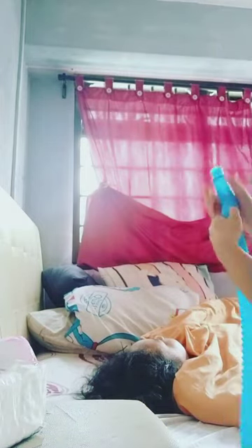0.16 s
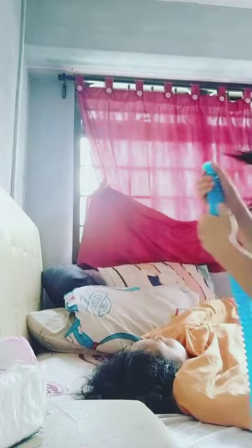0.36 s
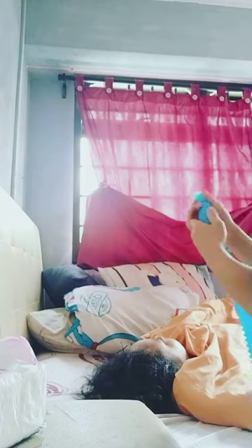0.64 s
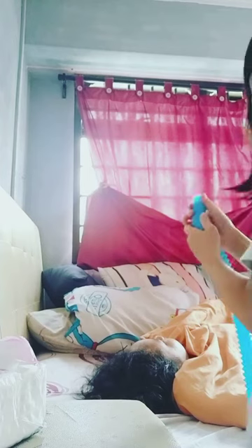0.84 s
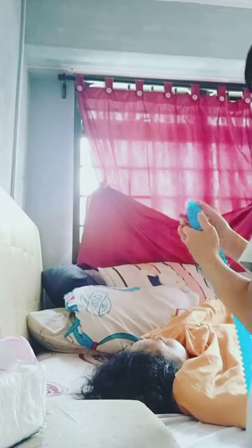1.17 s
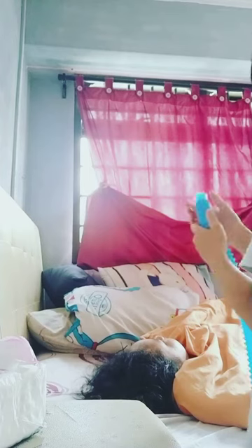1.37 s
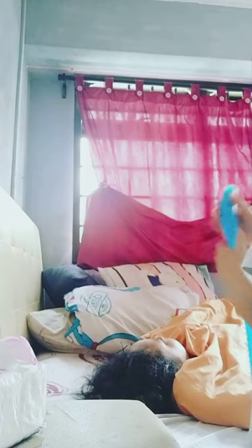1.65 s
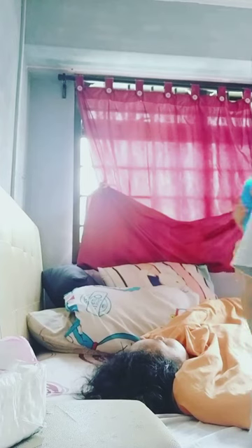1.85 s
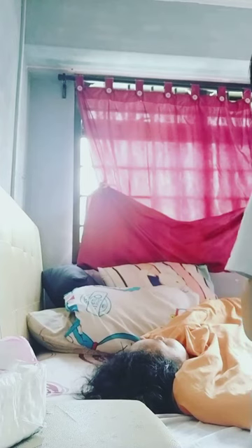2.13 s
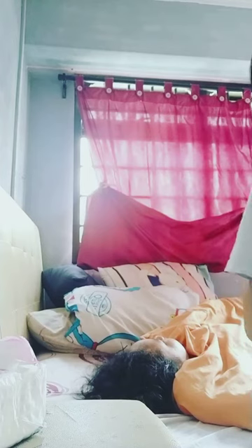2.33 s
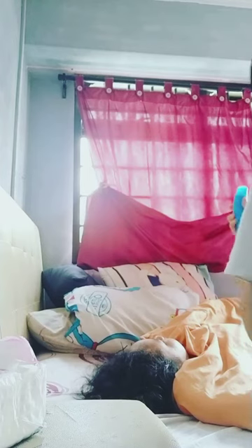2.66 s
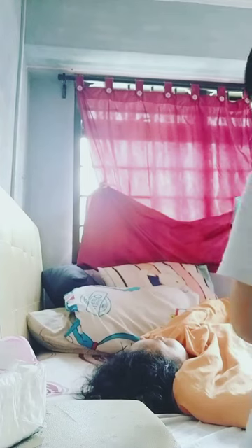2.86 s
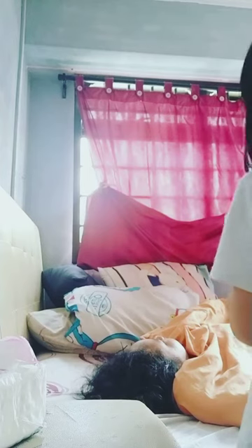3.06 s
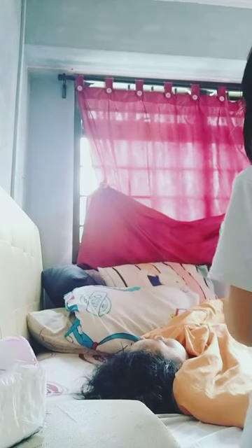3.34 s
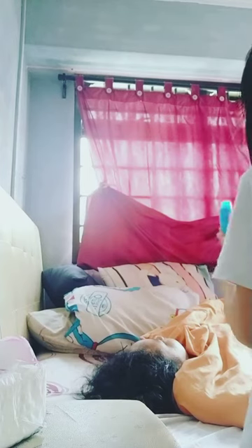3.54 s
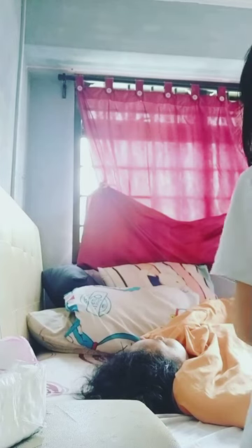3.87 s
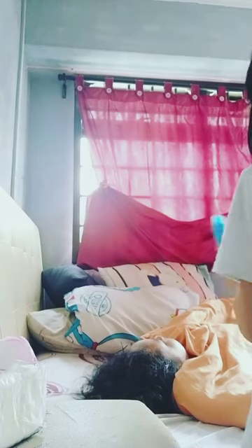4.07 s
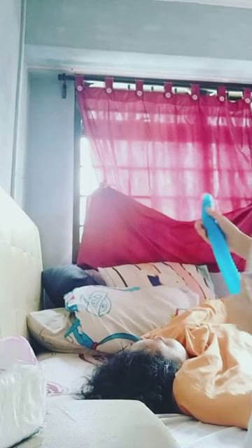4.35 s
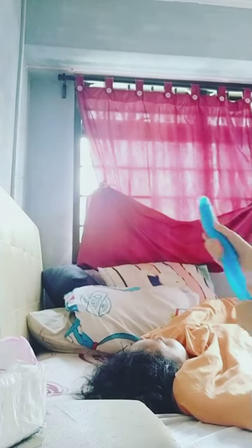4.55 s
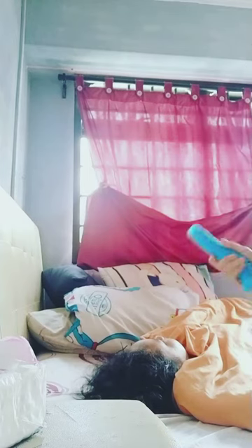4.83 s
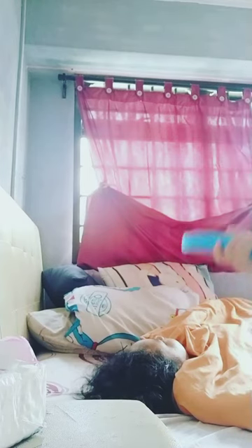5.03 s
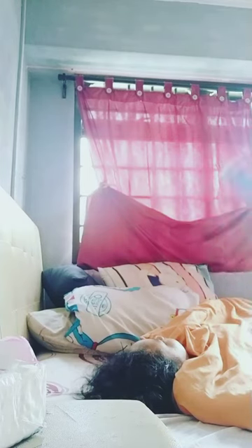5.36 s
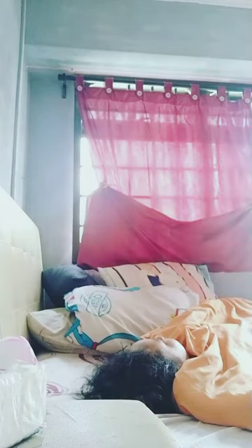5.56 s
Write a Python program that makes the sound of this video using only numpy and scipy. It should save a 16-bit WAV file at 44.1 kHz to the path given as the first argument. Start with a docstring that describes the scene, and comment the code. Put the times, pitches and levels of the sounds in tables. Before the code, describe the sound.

Loud, crisp plastic ridges snap in separate clusters, each later burst ringing more hollow and higher, over faint low room rumble.

```python
"""A low hum and rumble fill a small bedroom, and fingers hiss softly along a corrugated plastic pop tube.
The tube is then squeezed shut in short bursts: each ridge snaps over with a sharp crack, made of shaped
noise pulses, and rings the air column, damped sines whose note climbs as the tube shortens.
Handling thuds dully during the squeezes, a fingertip ticks and skin hisses between bursts,
and a decaying noise tail answers every snap; the bursts start on ever higher notes."""
import sys
import numpy as np
from scipy import signal
from scipy.fft import rfft, irfft, next_fast_len
from scipy.io import wavfile
from scipy.ndimage import uniform_filter1d

SR = 44100
rng = np.random.default_rng(int(sys.argv[2]) if len(sys.argv) > 2 else 0)


def bounce(signal):
    """Save signal as a 16-bit WAV file at the path given by the first command-line argument."""
    frames = np.transpose(np.atleast_2d(signal))
    limited = np.clip(frames, -1, 1)
    pcm = np.round(limited * 32767).astype(np.int16)
    wavfile.write(sys.argv[1], SR, pcm)


N = 251370  # length in samples

# Spectrum of the room's own noise. Each row: frequency in Hz, relative density in dB per Hz.
ROOM_NOISE_SPECTRUM = [(25, -2.5), (60, 3), (110, 4), (160, -1), (260, -11.5), (550, -7), (880, -6.5),
                       (1200, -13.5), (1500, -9), (2000, -18.5), (3200, -20), (4100, -41), (6000, -20.5),
                       (10000, -43)]
# Level of the room's noise, before its lean to the right. Each row: time in seconds, level in dB.
ROOM_NOISE_LEVEL = [(.1, -64), (.5, -62.5), (1.099, -73.5), (1.8, -71), (2.499, -63.5), (3.401, -61),
                    (4.3, -62.5), (5.101, -61.5), (5.7, -67)]

# Fingers sliding to a new grip. Each row: centre in seconds, half length in seconds, level in dB.
GRIP_SLIDES = [(0.165, 0.072, -59.5), (1.684, 0.047, -54.5), (2.58, 0.054, -56), (3.451, 0.048, -56.5),
               (4.31, 0.047, -51.5), (4.463, 0.033, -54.5)]
# Spectrum of skin on plastic. Each row: frequency in Hz, relative density in dB per Hz.
SKIN_SPECTRUM = [(3000, -14.5), (4200, -8), (5400, 4), (7000, 0.5), (9000, -9), (13000, -12), (16000, 1.5)]

# Ridges snapping over. Each row: start in seconds, crack level in dB, brightness in dB per octave,
# air-column ring in dB.
RIDGE_SNAPS = [(0.4072, -5.5, -4, -28.5), (0.4409, -1.5, -6, -34.5), (.578, 15, -2.5, -34.5),
               (0.6243, 14.5, -2.5, -33), (0.6707, 1.5, -7.5, -43), (0.7625, 4, -2.5, -50),
               (0.8647, 1, -5.5, -46), (1.8831, -31, -18.5, -38.5), (1.9279, 13.5, -2, -25.5),
               (1.936, -3.5, 0.5, -46), (2.062, 7, -3, -41.5), (2.0767, 1, 2.5, -43),
               (2.081, 14, -1, -43.5), (2.1447, 14, 0.5, -36.5), (2.2008, 17, -3, -31),
               (2.216, 11, -7, -29), (2.7582, -14, -0.5, -21), (2.7635, 12, -1, -21), (2.7736, 11, -4, -38),
               (2.8718, -8, -9, -27.5), (2.8842, 8.5, -6.5, -45), (2.9165, 19, -0.5, -35),
               (3.0148, 7, 9, -53), (3.0796, 18, 2, -30), (3.1115, 16, -6, -28.5), (3.54, -33, 2.5, -38),
               (3.5755, 8.5, -3.5, -29.5), (3.5904, 15, -6, -19), (3.7324, 4.5, -10, -26),
               (3.7802, 17, -1.5, -29), (3.7893, 0.5, 5.5, -49.5), (3.8644, 1, -1.5, -37),
               (3.9255, 12.5, -6.5, -37), (3.9568, 8.5, -5, -27.5), (4.5828, 9.5, -4.5, -27),
               (4.5963, 1, -1.5, -19), (4.6068, 4, -18, -31), (4.6154, 4, -5.5, -20),
               (4.627, -10, -2, -38.5), (4.635, 14, -11, -18.5), (4.7614, 9, -14.5, -15),
               (4.858, -14.5, -7, -32.5), (4.8825, 12.5, -13, -12), (5.2579, -1, -8, -16.5),
               (5.2925, 10.5, -8.5, -10), (5.2985, 17.5, -7, -21.5), (5.306, 2, -5, -13.5),
               (5.3268, 8, -8, -15), (5.3419, 6.5, -3, -11), (5.367, 17.5, -4.5, -16),
               (5.3951, 16, -4.5, -13), (5.437, 11.5, 1, -16), (5.4615, 4.5, -12.5, -16.5),
               (5.5894, 8.5, -9.5, -5), (5.5987, 14, -4.5, -5), (5.6849, 5.5, -16, -13.5),
               (5.6911, 7, 2.5, -27)]
# Squeezes of the tube; every snap shortens the pipe and lifts its note one step.
# Each row: start in seconds, first note in Hz, step in Hz, octave over the note in dB, dome of the crack
# spectrum in dB per octave squared, ridge resonance in Hz, its sag in octaves per second, its height in dB,
# knock of the stack in dB, room in dB, lean of the crack to the left in dB.
SQUEEZE_STROKES = [(.39, 278.3, 2.5, -7, 3.5, 5200, 4.6, 2.5, -7, -0.5, 1.5),
                   (1.87, 293.8, 5.8, -2, 5.5, 3150, .5, 8, -21, -0.5, 2),
                   (2.74, 340, 6, -9, 8.5, 4900, 4.3, 4.5, -29, -0.5, 1),
                   (3.52, 371.1, 11.5, -3.5, 5, 5300, 4.9, 7, -35, -1, 0.8),
                   (4.56, 411, 7.1, -12.5, 3, 4600, 0.18, 20, -21, 3, .3),
                   (4.632, 464.8, 13, 0, -1.04, 2300, 0.34, 4.5, -0.5, -5, 1.1),
                   (5.24, 525, 4.6, -2.5, 5.5, 1950, .3, 4.5, -4.5, -5.5, 1),
                   (5.57, 561, 1.7, -16.5, 6.5, 2900, .3, 10, 2.5, -3.5, 1.4)]
# Colour the plastic wall gives to all cracks. Each row: frequency in Hz, gain in dB.
WALL_COLOUR = [(60, -51.5), (200, -30.5), (450, -15.5), (750, -6.5), (1150, -1), (1700, -4), (2300, -2),
               (3300, 0), (4000, -1), (5000, 4.5), (7200, 8.5), (8800, 0.5), (10500, -2), (14000, 10.5)]
# Higher air-column modes. Each row: multiple of the note, level in dB relative to the crack and
# decay time t60 in seconds, both for a pipe at the reference note.
COLUMN_OVERTONES = [(3.06, -44.5, 0.12), (4.02, -38.5, 0.059), (5.1, -49.5, 0.069), (6.06, -43, 0.064),
                    (7.2, -61.5, 0.027)]
# Short-lived modes of the folded stack of ridges, loud in the dull pops.
# Each row: frequency in Hz, level in dB relative to the crack before the squeeze's knock, t60 in seconds.
STACK_MODES = [(1020, -31.5, 0.0067), (1160, -46, 0.0094), (1350, -46, 0.0053), (1880, -44, 0.054),
               (2450, -32.5, 0.041)]
# Decay of the room. Each row: frequency in Hz, t60 in seconds.
ROOM_DECAY = [(150, 0.5), (400, 0.18), (1000, 0.31), (3000, 0.27), (7000, 0.29), (13000, 0.29)]
# Colour of the room's answer. Each row: frequency in Hz, gain in dB.
ROOM_COLOUR = [(150, 8.5), (500, 8), (1100, -4), (3000, -2.5), (6000, -2), (13000, -2.5)]

# Soft thuds of handling the tube. Each row: start in seconds, frequency in Hz, level in dB, t60 in seconds.
HAND_BUMPS = [(0.623, 70, -41, 0.061), (0.624, 131, -49, 0.053), (4.615, 170, -33, 0.066),
              (4.632, 220, -35.5, 0.11)]

# A fingertip ticks against the tube while changing grip. Each row: start in seconds, level in dB.
FINGER_TICKS = [(1.504, -64.5), (4.198, -54)]
# Spectrum of a tick. Each row: frequency in Hz, relative density in dB per Hz.
TICK_SPECTRUM = [(2200, -27), (3100, -14), (3550, -1.5), (4200, -18), (6000, -13), (14000, -29)]

# the crack's tilted dome pivots on the first frequency and is flat below the second
CRACK_MID_HZ, CRACK_LOW_HZ = 2500, 1190
# every squeeze starts with this dome (dB per octave squared) and reaches its own once the grip is firm
FIRST_DOME, FIRM_S = 1.6, 0.2
RIDGE_OCTAVES = 0.3  # half width of the ridge's resonance
REFERENCE_NOTE_HZ = 400  # note of a pipe of relative length 1
TICK_T60 = 0.19  # s
TOP_HZ = 16000  # band limit


def amp(db):
    """Decibels are a logarithmic measure of amplitude; this returns the gain."""
    return 10 ** (np.asarray(db) / 20)


def unit(x):
    """Dividing by the root mean square sets the rms to 1."""
    return x / np.sqrt(np.mean(x ** 2) + 1e-20)


def along(points, hz):
    """Interpolation on a logarithmic frequency axis, for rows of frequency and value."""
    f, values = np.transpose(points)
    return np.interp(np.log(hz + 1), np.log(f), values)


def filtered(x, response):
    """Linear filtering: the spectrum of x is multiplied by a response of frequency."""
    n = x.shape[-1]
    padded = next_fast_len(n + 2048)
    hz = np.fft.rfftfreq(padded, 1 / SR)
    return irfft(rfft(x, padded) * response(hz), padded)[..., :n]


def noise(spectrum, apart):
    """Stereo noise of rms 1 as mid and side; apart is the weight of the side, which differs left to right."""
    mid, side = filtered(rng.standard_normal((2, N)), lambda hz: amp(along(spectrum, hz)))
    return unit(np.array([mid + apart * side, mid - apart * side]))


def mode(t, hz, db, t60, attack_s=0.0023):
    """One damped resonance: a sine with exponential decay and a short onset."""
    onset = 1 - np.exp(-t / attack_s)
    return amp(db - 60 * t / t60) * np.sin(2 * np.pi * hz * t) * onset


def room_noise(right_db=7.5, hum_hz=63, hum_db=-69):
    """Superposition of broadband rumble of slowly varying level and a steady sine hum, stronger on the right."""
    t = np.arange(N) / SR
    level_db = np.interp(t, *np.transpose(ROOM_NOISE_LEVEL))
    rumble = amp(level_db) * noise(ROOM_NOISE_SPECTRUM, apart=1.0)
    hum = amp(hum_db) * np.sin(2 * np.pi * hum_hz * t)
    return (rumble + hum) * amp([[-right_db], [right_db]])


def fingers():
    """Sliding friction: skin hisses on the plastic in soft Gaussian swells."""
    t = np.arange(N) / SR
    swell = sum(amp(db) * np.exp(-.5 * ((t - s) / width) ** 2) for s, width, db in GRIP_SLIDES)
    return swell * noise(SKIN_SPECTRUM, apart=1.0)


def crack_colour(db, brightness, dome, ridge_hz, ridge_db):
    """Spectral envelope of one crack: a tilted dome carries the ridge's resonance, coloured by the wall."""
    def colour(hz):
        octaves = np.log2(np.maximum(hz, CRACK_LOW_HZ) / CRACK_MID_HZ)
        peak = np.exp(-.5 * (np.log2((hz + 1) / ridge_hz) / RIDGE_OCTAVES) ** 2)
        dome_db = db + brightness * octaves - dome * octaves ** 2
        return dome_db + ridge_db * (peak - .5) + along(WALL_COLOUR, hz)
    return colour


def snaps():
    """A shorter pipe has a higher note: it climbs by steps in each squeeze as the ridge's resonance sinks."""
    ends = [row[0] for row in SQUEEZE_STROKES[1:]] + [np.inf]
    for squeeze, end in zip(SQUEEZE_STROKES, ends):
        start, first_hz, step_hz, octave_db, dome, ridge_hz, sag, ridge_db, *hold = squeeze
        run = [row for row in RIDGE_SNAPS if start <= row[0] < end]
        for k, (s, db, brightness, ring_db) in enumerate(run):
            firm = min((s - start) / FIRM_S, 1)
            dome_now = FIRST_DOME + firm * (dome - FIRST_DOME)
            # the tabled resonance is the one heard when the grip becomes firm
            ridge_now_hz = ridge_hz * 2 ** (-sag * (s - start - FIRM_S))
            colour = crack_colour(db, brightness, dome_now, ridge_now_hz, firm * ridge_db)
            yield s, first_hz + k * step_hz, ring_db, ring_db + octave_db, colour, hold


def click(gain_db, size=1024):
    """Minimum phase: the folded cepstrum gives the most compact causal pulse with a given spectrum."""
    hz = np.fft.rfftfreq(size, 1 / SR)
    cepstrum = irfft(np.log(amp(gain_db(hz))))
    cepstrum[1:size // 2] *= 2
    cepstrum[size // 2 + 1:] = 0
    return irfft(np.exp(rfft(cepstrum)))


def crack(colour, echo_s=.0013, echo=0.99, burst=1.0, burst_s=0.0029, crinkle=1.0, crinkle_t60=0.016,
          size=1024):
    """Impulse and early reflection: a sharp click, its quick echo off a nearby surface, and brief noise."""
    t = np.arange(size) / SR
    # a short noise burst spreads the click
    push = rng.standard_normal(size) * np.sin(np.pi * np.minimum(t / burst_s, 1))
    push *= burst / np.linalg.norm(push)
    push[0] += 1
    # the echo's delay is drawn at random within a fifth of echo_s
    push[round(echo_s * rng.uniform(.8, 1.2) * SR)] += echo
    # the wall crinkles briefly
    scatter = rng.standard_normal((2, size)) * amp(-60 * t / crinkle_t60)
    push = push / np.linalg.norm(push) + crinkle * scatter / np.linalg.norm(scatter[0])
    # the push carries the same energy in every broad band
    spectrum = rfft(push, 2 * size)
    power = np.mean(np.abs(spectrum) ** 2, 0)
    spectrum /= np.sqrt(uniform_filter1d(power, size=61))
    return signal.fftconvolve(irfft(spectrum)[:, :size], click(colour)[None], axes=1)


def through_pipe(x, note_hz, reflection=0.43, leak_hz=2600):
    """Repeated reflection: a crack runs to and fro between the open ends; its treble escapes at once."""
    def response(hz):
        kept = reflection * np.exp(-(hz / leak_hz) ** 2)
        round_trip = np.exp(-2j * np.pi * hz / note_hz)
        return np.sqrt(1 - kept ** 2) / (1 - kept * round_trip)
    return filtered(x, response)


def air_column(t, note_hz, note_db, octave_db, colour, note_t60=0.11, octave_t60=0.088, note_trim_db=-1,
               shrink=1.8, long_pipe_db=4, mouth_hz=220):
    """An open pipe resonates at near multiples of its note; a longer one rings longer, with more overtones."""
    length = REFERENCE_NOTE_HZ / note_hz
    life = length ** shrink  # scales every t60
    ring = mode(t, note_hz, note_db + note_trim_db, note_t60 * life)
    ring = ring + mode(t, 2 * note_hz, octave_db, octave_t60 * life)
    for multiple, db, t60 in COLUMN_OVERTONES:
        hz = multiple * note_hz
        drive_db = colour(max(hz, CRACK_LOW_HZ)) + long_pipe_db * np.log2(length)
        chance_db = 2 * rng.standard_normal()
        ring = ring + mode(t, hz, drive_db + db + chance_db, t60 * life)
    # the narrow mouth radiates little bass
    mouth = signal.butter(3, mouth_hz, "high", fs=SR, output="sos")
    return signal.sosfilt(mouth, ring)


def stack_knock(t, colour, stack_db):
    """Modal impact: in the hard strokes the ridges slam together and the folded stack rings briefly."""
    return sum(mode(t, hz, colour(hz) + db + stack_db, t60, attack_s=0.0002) for hz, db, t60 in STACK_MODES)


def room_tail(t, alike_hz=900, build_s=0.0075):
    """Diffuse reverberation: noise dying at a rate set by frequency, its bass alike on both sides."""
    hz, when, z = signal.stft(rng.standard_normal((2, len(t))), SR, nperseg=256)
    z = z * amp(-60 * when / along(ROOM_DECAY, hz)[:, None])
    turn = np.pi / 4 * (hz / np.hypot(hz, alike_hz))[:, None]
    mid_side = [z[0] * np.cos(turn), z[1] * np.sin(turn)]
    mid, side = signal.istft(mid_side, SR, nperseg=256)[1][:, :len(t)]
    tail = np.array([mid + side, mid - side]) * (1 - np.exp(-(t / build_s) ** 2))
    # energy 1 on the left before the room's colour
    return filtered(tail / np.linalg.norm(tail[0]), lambda f: amp(along(ROOM_COLOUR, f)))


def tube(crack_db=0.63, ring_wet_db=-8, bounce_s=.0087, bounce_db=-17.0, lag_s=.00008):
    """Superposition of crack, pipe note and stack knock, one reflection off a near wall, and the room."""
    t = np.arange(SR // 2) / SR
    out = np.zeros((2, N + SR))

    def full_length(x):
        return np.pad(x, ((0, 0), (0, len(t) - x.shape[1])))

    def paths(hz):
        # the right side hears the tube first
        lag = np.exp(1j * np.pi * hz * lag_s * np.array([[-1], [1]]))
        return lag * (1 + amp(bounce_db) * np.exp(-2j * np.pi * hz * bounce_s))

    for s, note_hz, note_db, octave_db, colour, (stack_db, wet_db, left_db) in snaps():
        snap = through_pipe(full_length(amp(crack_db) * crack(colour)), note_hz)
        ring = stack_knock(t, colour, stack_db)
        ring = ring + air_column(t, note_hz, note_db, octave_db, colour)
        direct = filtered(snap * amp([[left_db], [-left_db]]) + ring, paths)
        # the room gathers the crack from all directions, so its ripples average out
        radiated = through_pipe(full_length(click(colour)[None]), note_hz) + amp(ring_wet_db) * ring
        room = signal.fftconvolve(radiated, room_tail(t), axes=1)[:, :len(t)]
        first = round(s * SR)
        out[:, first:first + len(t)] += direct + amp(wet_db) * room
    return out[:, :N]


def bumps():
    """Damped low resonances: dull low thuds of the hands handling the tube during the squeezes."""
    t = np.arange(N) / SR
    return sum(mode(np.maximum(t - s, 0), hz, db, t60) for s, hz, db, t60 in HAND_BUMPS)


def ticks():
    """Exponential decay: tiny taps of coloured noise on the wall that fade with the room."""
    t = np.arange(N) / SR
    fade = sum((t >= s) * amp(db - 60 * np.abs(t - s) / TICK_T60) for s, db in FINGER_TICKS)
    return fade * noise(TICK_SPECTRUM, apart=1.0)


def scene():
    """Linear superposition of the room, the hands and the tube."""
    return room_noise() + fingers() + tube() + bumps() + ticks()


def record(dry, ceiling=0.9):
    """Soft saturation rounds off the highest peaks; a steep low-pass then removes the band above TOP_HZ."""
    held = dry / (1 + np.abs(dry / ceiling) ** 6) ** (1 / 6)
    return filtered(held, lambda hz: 1 / (1 + (hz / TOP_HZ) ** 120))


dry = scene()
out = record(dry)
bounce(out)
```